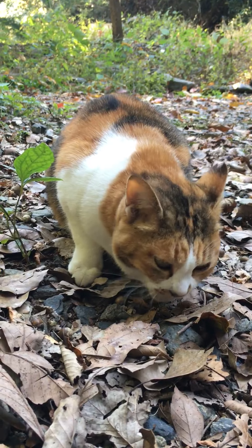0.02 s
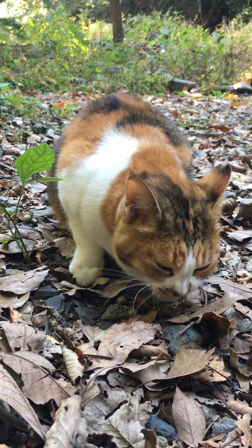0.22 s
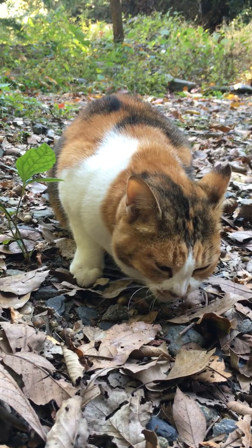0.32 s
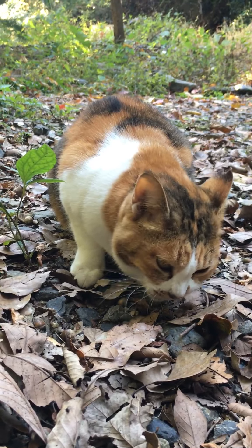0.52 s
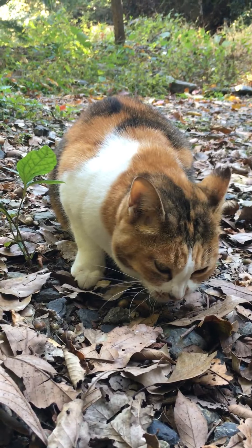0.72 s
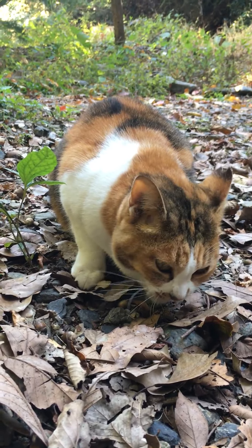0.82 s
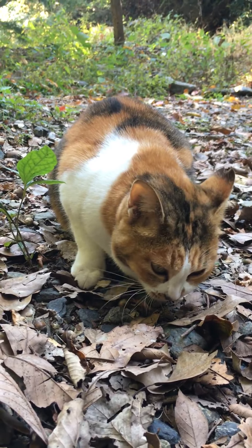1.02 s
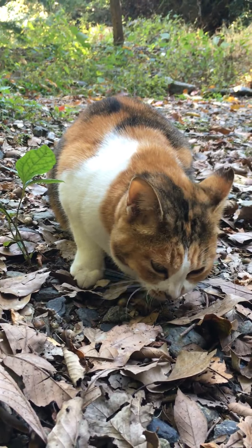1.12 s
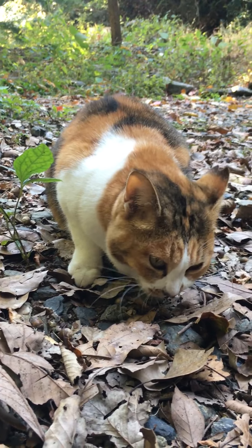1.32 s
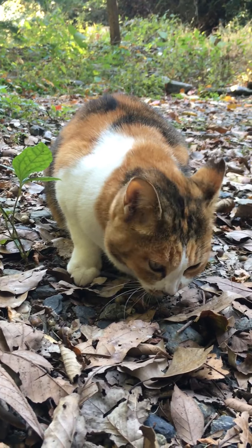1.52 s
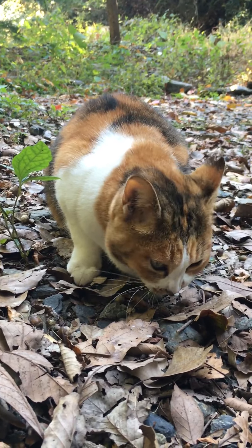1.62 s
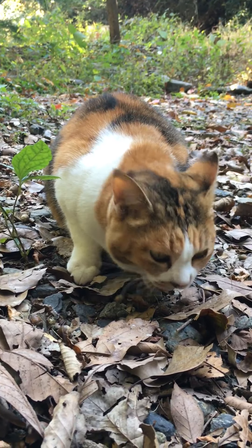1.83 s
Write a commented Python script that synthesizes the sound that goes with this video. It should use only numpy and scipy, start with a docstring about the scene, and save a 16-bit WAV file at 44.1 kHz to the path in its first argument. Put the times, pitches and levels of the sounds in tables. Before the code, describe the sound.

Close, centred crunching of thin fish bones in a cat's mouth, four bites with sharp bright snaps and a small hollow knock, tiny wet and leafy ticks between, faint outdoor hiss and distant low rumble behind.

```python
"""A cat chews a small fish on dry leaves, close by: four bites, a little over two a second.
In each bite thin bones snap: sharp, coloured pulses with splintery noise and a hollow mouth knock.
A low jaw thud joins each bite, and leaf litter scatters the sound briefly, with one faint reflection.
Faint random ticks of wet mouth and dry leaves fall all through, made like small snaps.
Behind lie shaped noise for a steady outdoor hiss and a distant rumble, and a faint wavering hum."""
import sys
import numpy as np
from scipy import signal
from scipy.fft import rfft, irfft
from scipy.io import wavfile

SR = 44100
rng = np.random.default_rng(int(sys.argv[2]) if len(sys.argv) > 2 else 0)


def to_wav(s):
    """Save 16-bit WAV."""
    ch = np.atleast_2d(s).T  # columns
    pcm = np.round(np.clip(ch, -1, 1) * 32767)  # PCM
    wavfile.write(sys.argv[1], SR, pcm.astype(np.int16))


N = 83790  # length of the scene in samples

LEAD_S = 0.001  # room before the main click for the short smear left by evening out the spectrum

# One row per snap, or per extra ringing part of a snap. The knock level is relative to the bone part.
# Columns: break_s, level_db, ring_hz, ring_db, ring_width_octaves, knock_db
BONE_SNAPS = [(0.0373, -31.5, 12100, 25, 0.23, -15), (0.182, -22.5, 5830, 22, 0.7, -5.5),
              (0.2275, -2, 6330, 9, 0.25, -12.5), (0.5039, -30, 6500, 9, 0.21, -17),
              (0.5113, -27.5, 6500, 17, 0.36, 5), (0.6797, -20, 12300, 7, 0.2, -12),
              (0.6793, -26, 4840, 19, 0.15, -15), (0.7133, -16, 9900, 12, 0.12, -24),
              (0.7144, -19.5, 5800, 5, 0.18, -19), (0.7184, -17, 9400, 12, 0.12, -12),
              (0.7194, -13, 5600, 7, 0.16, -6), (0.724, -19, 7800, 1, 0.72, -28),
              (0.7255, -12, 11100, 6, 0.49, -9.5), (0.9072, -26.5, 12300, 11, 0.11, -8),
              (1.0058, -32, 12500, 22, 0.13, -26), (1.0905, -31, 4400, 12, 0.13, -6),
              (1.1038, -12.5, 10700, 18, 0.53, -30), (1.1042, -21, 4140, 18, 0.15, -4.5),
              (1.1375, -27, 9000, 1, 0.35, -7), (1.152, -24, 10500, 17, 0.47, -19),
              (1.5503, -22, 6150, 18, 0.53, -24), (1.5511, -24, 6860, 18, 0.17, -37),
              (1.5959, -19.5, 9400, 19, 0.75, -19), (1.6073, -13.5, 7000, 17, 0.25, -14.5),
              (1.6142, -10.5, 8160, 14, 0.6, -20), (1.6224, -16.5, 8150, 6, 0.31, -11.5),
              (1.6335, -27.5, 7100, 6, 0.32, -25), (1.635, -29, 6800, 22, 0.17, -12),
              (1.6533, -24.5, 4400, 7, 1, -11)]
# The jaw jolts shut as the bone gives way, once per bite. Columns: start_s, level_db, pitch_hz
JAW_THUDS = [(.2282, -28.5, 476), (.7245, -28.5, 420), (1.1048, -29.5, 540), (1.613, -33, 520)]


def chewing():
    """Four bites: every snap part and jaw thud is placed at its own time and level."""
    out = np.zeros(N)
    for break_s, level_db, *colour in BONE_SNAPS:
        add(out, break_s - LEAD_S, amp(level_db) * snap(*colour))
    for start_s, level_db, pitch_hz in JAW_THUDS:
        add(out, start_s, amp(level_db) * thud(pitch_hz))
    return out


# Colour of breaking bone, shared by all snaps and ticks. Columns: pitch_hz, level_db
BONE_COLOUR = [(100, -38), (1000, -24), (2500, -13.5), (3700, -3), (4600, -1), (5900, -4), (7200, -6.5),
               (8300, -2.5), (9700, 0), (10700, -7), (12300, -8), (13500, -4.5), (15400, -8.5),
               (17000, -13.5)]
# Hollow knock of the mouth around the bone. Columns: pitch_hz, level_db
MOUTH_COLOUR = [(100, -43), (700, -15), (1000, -9.5), (1450, -0.5), (2000, -3), (2600, -11.5), (4000, -11),
                (17000, -60)]
# Splintery noise that starts with the main break and dies away:
# level relative to the break before evening out, and decay of the starting noise
SPLINTER_DB, SPLINTER_DECAY_S = 0.5, 0.0036


def snap(ring_hz, ring_db, ring_octaves, knock_db, size=4096):
    """A bone breaks and splinters: a sudden release rings the bone and the hollow mouth around it."""
    hz = np.fft.rfftfreq(size, 1 / SR)
    octaves_away = np.log2((hz + 1) / ring_hz)
    ring = ring_db * np.exp(-.5 * (octaves_away / ring_octaves) ** 2)
    bone = unit(amp(read(BONE_COLOUR, hz) + ring))
    mouth = amp(knock_db) * unit(amp(read(MOUTH_COLOUR, hz)))
    colour = np.hypot(bone, mouth)

    fracture = np.zeros(size)
    add(fracture, LEAD_S, np.ones(1))  # the main break is a single click
    add(fracture, LEAD_S, amp(SPLINTER_DB) * burst(SPLINTER_DECAY_S))
    even_fracture = whiten(fracture)[:size // 2]
    return unit(signal.fftconvolve(pulse(colour), even_fracture)[:size])


THUD_T60_S = 0.015  # time for the thud to fall by 60 dB


def thud(hz, size=4096):
    """The jaw swings at one low pitch and is quickly damped."""
    swing = fade(THUD_T60_S) * np.sin(2 * np.pi * hz * np.arange(size) / SR)
    return unit(np.diff(swing))


# Levels are relative to the direct sound; decays are those of the starting noise
LITTER_DB, LITTER_DECAY_S = -16, 0.029
ECHO_DELAY_S, ECHO_DB, ECHO_DECAY_S = 0.0082, -23.5, 0.0072


def ground(x):
    """Leaf litter scatters the sound into a short noisy tail; something nearby adds a blurred echo."""
    response = amp(LITTER_DB) * burst(LITTER_DECAY_S)
    add(response, ECHO_DELAY_S, amp(ECHO_DB) * burst(ECHO_DECAY_S))
    return signal.fftconvolve(x, response)[:N]


TICKS_PER_S = 10
TICK_MIN_DB, TICK_MAX_DB = -56.5, -46.5
TICK_LOW_HZ, TICK_HIGH_HZ = 3500, 14000


def ticks():
    """Wet mouth and dry leaves tick faintly: tiny snaps at random times, levels and pitches."""
    out = np.zeros(N)
    for when, size, pitch in rng.random((round(TICKS_PER_S * N / SR), 3)):
        hz = TICK_LOW_HZ * (TICK_HIGH_HZ / TICK_LOW_HZ) ** pitch
        level_db = TICK_MIN_DB + (TICK_MAX_DB - TICK_MIN_DB) * size
        tick = snap(hz, ring_db=5, ring_octaves=.35, knock_db=-15)
        add(out, when * N / SR, amp(level_db) * tick)
    return out


# Colour of the outdoor hiss. Columns: pitch_hz, level_db (per Hz, relative)
HISS_COLOUR = [(100, -10.5), (330, 2.5), (520, -2.5), (750, -2.5), (1000, 0), (1500, 0), (2300, -1.5),
               (2900, 0), (4300, -2), (4950, -6.5), (5600, -1.76), (6700, -1.5), (7600, -7), (8900, -3.5),
               (9800, -5.5), (10400, -10.5), (11200, -6), (13200, -8.5), (15650, -13), (16000, -42)]
HISS_DB = -53


def hiss():
    """Steady outdoor hiss: random noise shaped by its colour."""
    return amp(HISS_DB) * noise(HISS_COLOUR)


# Colour of the distant rumble. Columns: pitch_hz, level_db (per Hz, relative)
RUMBLE_COLOUR = [(15, -54), (23, -16), (36, -5.5), (50, 1), (62, -1), (85, -1), (115, -9), (185, -9.5),
                 (250, -21), (500, -44), (2000, -86)]
RUMBLE_DB = -55


def rumble():
    """Low distant rumble: random noise kept to the deep pitches."""
    return amp(RUMBLE_DB) * noise(RUMBLE_COLOUR)


HUM_HZ, HUM_DB = 60.25, -65
HUM_WAVER, WAVER_HZ = 0.56, 4.8  # rms depth as a fraction; pitch above which the waver falls away


def hum():
    """A faint low tone whose strength wavers slowly and randomly."""
    waver = noise([(WAVER_HZ, 0), (2 * WAVER_HZ, -40), (10 * WAVER_HZ, -100)])
    tone = np.sin(2 * np.pi * (HUM_HZ * np.arange(N) / SR + rng.random()))
    wavering = (1 + HUM_WAVER * waver) * tone
    return amp(HUM_DB) * wavering / wavering.std()


def background():
    """Hiss, rumble and hum sound together beneath the chewing."""
    return hiss() + rumble() + hum()


def amp(db):
    """Turns decibels into a plain multiplier."""
    return 10 ** (np.asarray(db) / 20)


def unit(x):
    """Scales a short sound or spectrum to energy 1."""
    return x / np.sqrt(np.sum(x ** 2) + 1e-20)


def read(points, hz):
    """Reads levels between the points of a colour table, with pitch on a log scale."""
    f, db = np.transpose(points)
    return np.interp(np.log(hz + 1), np.log(f + 1), db)


def add(mix, s, sound):
    """Mixes a sound in at a time in seconds."""
    part = mix[max(round(s * SR), 0):][:len(sound)]
    part += sound[:len(part)]


def fade(t60, size=4096):
    """Smooth decay that falls by 60 dB in t60 seconds."""
    return np.exp(-np.log(1000) * np.arange(size) / SR / t60)


def whiten(x):
    """Evens out the spectrum of a short sound and keeps its phases."""
    z = rfft(x)
    return irfft(z / (abs(z) + 1e-12))


def burst(decay_s, size=4096):
    """Dying noise of energy 1 with a nearly even spectrum."""
    decay = fade(decay_s, size=size)
    even_noise = whiten(rng.standard_normal(size) * decay)
    return unit(even_noise * np.sqrt(decay))  # fade again, since evening out smears the noise


def pulse(gain):
    """The sharpest pulse with this spectrum that never sounds before its start (minimum phase)."""
    log_gain = np.log(np.r_[gain, gain[-2:0:-1]] + 1e-9)
    return np.fft.ifft(np.exp(np.conj(signal.hilbert(log_gain)))).real


def noise(points):
    """Steady noise of rms 1 with the given colour."""
    colour = amp(read(points, np.fft.rfftfreq(N, 1 / SR)))
    x = irfft(rfft(rng.standard_normal(N)) * colour, N)
    return x / x.std()


def scene():
    """The cat is straight ahead, so both channels carry the same sound."""
    bites = chewing()
    mono = bites + ground(bites) + ticks() + background()
    return np.array([mono, mono])


CUTOFF_HZ = 16750


def record(dry):
    """The recorder's band limit removes the highest pitches."""
    lowpass = signal.firwin(255, CUTOFF_HZ, window=("kaiser", 8), fs=SR)
    return signal.oaconvolve(dry, lowpass[None], "same", axes=1)


dry = scene()
out = record(dry)
to_wav(out)
```